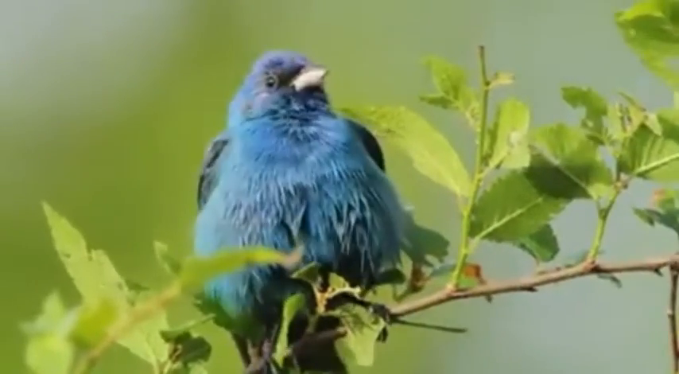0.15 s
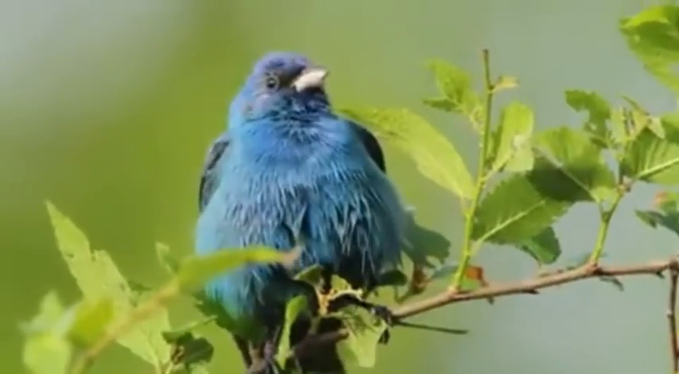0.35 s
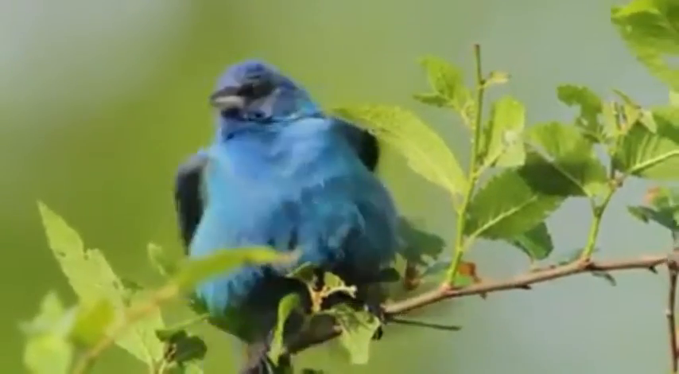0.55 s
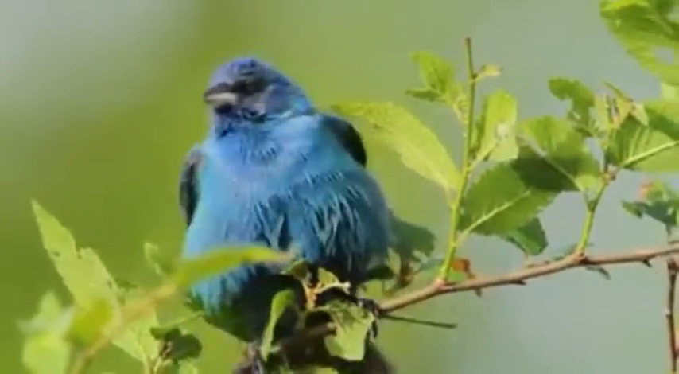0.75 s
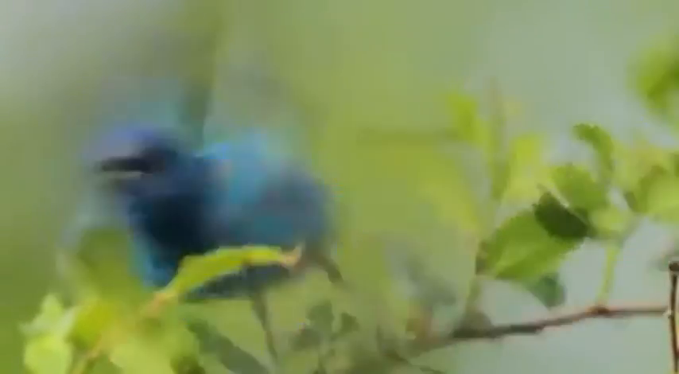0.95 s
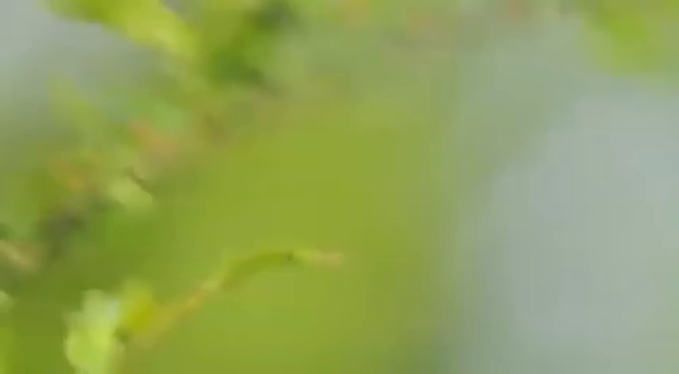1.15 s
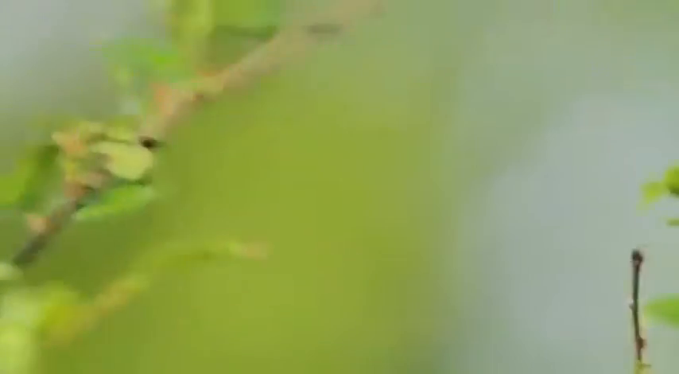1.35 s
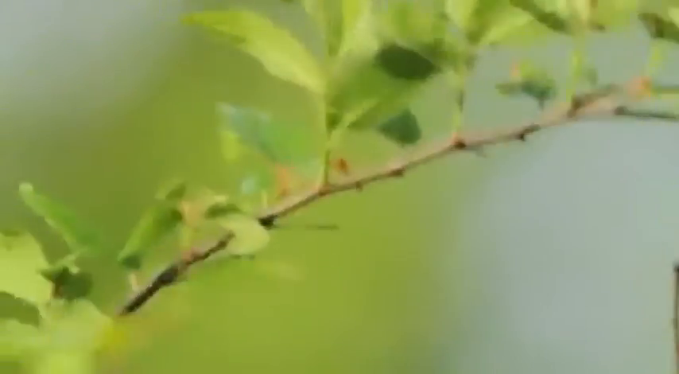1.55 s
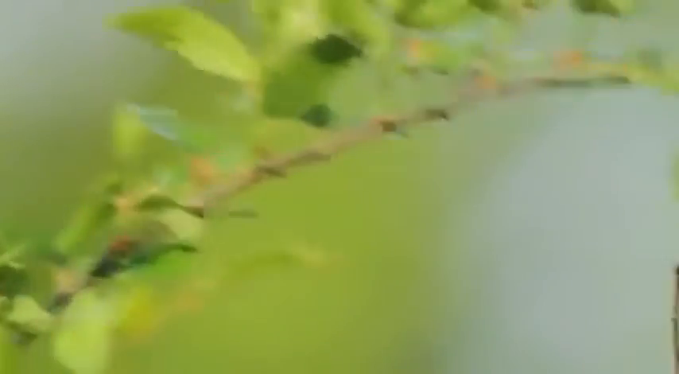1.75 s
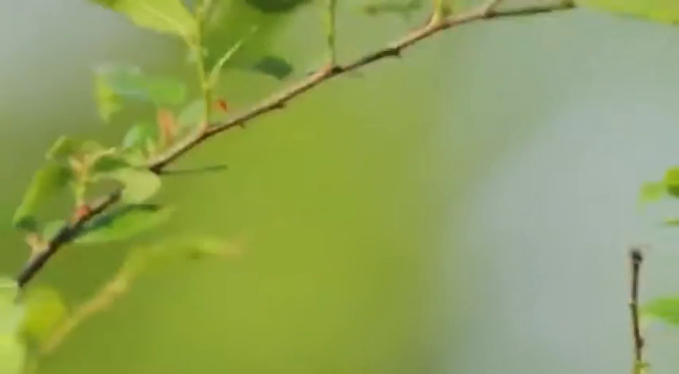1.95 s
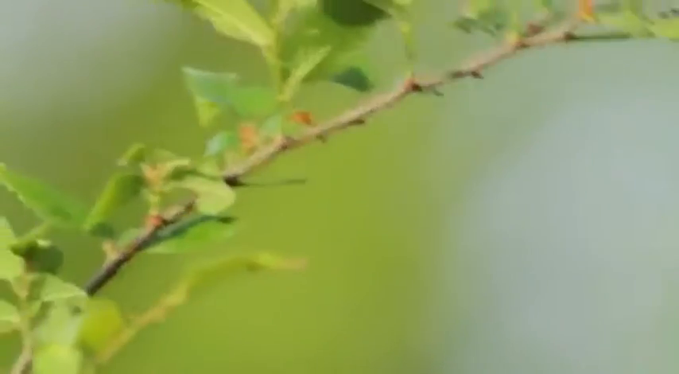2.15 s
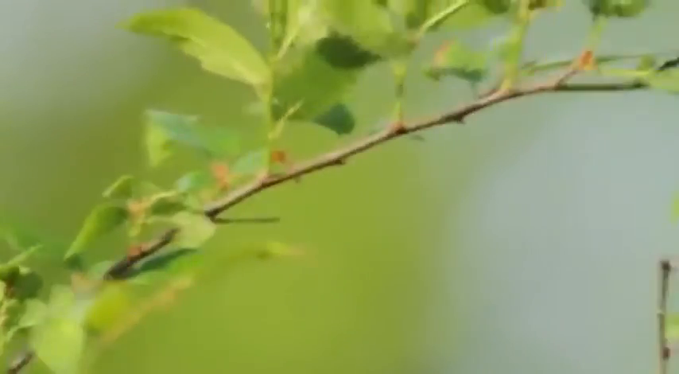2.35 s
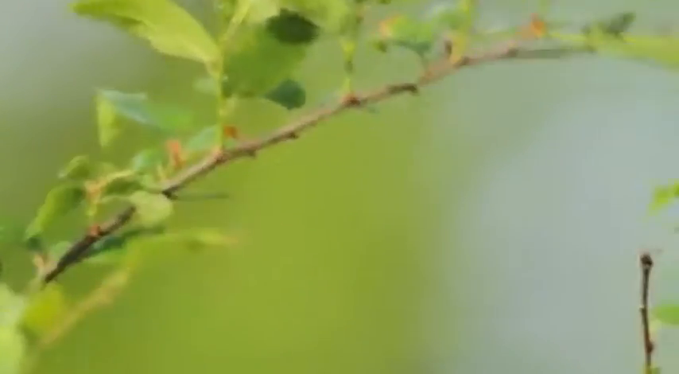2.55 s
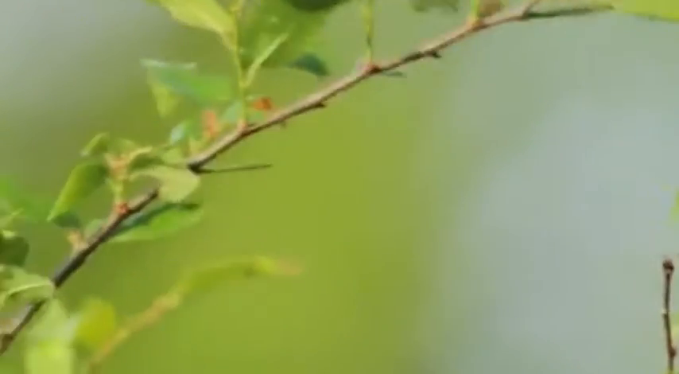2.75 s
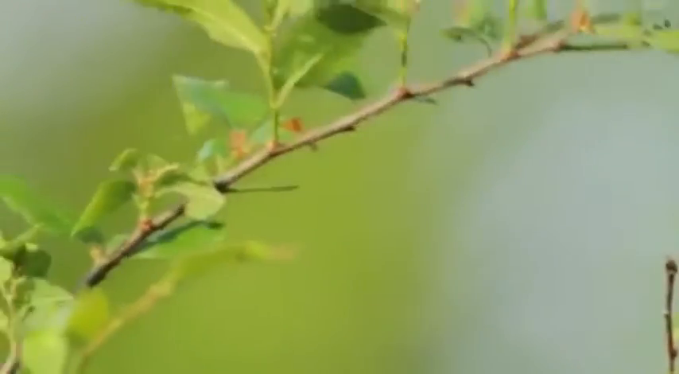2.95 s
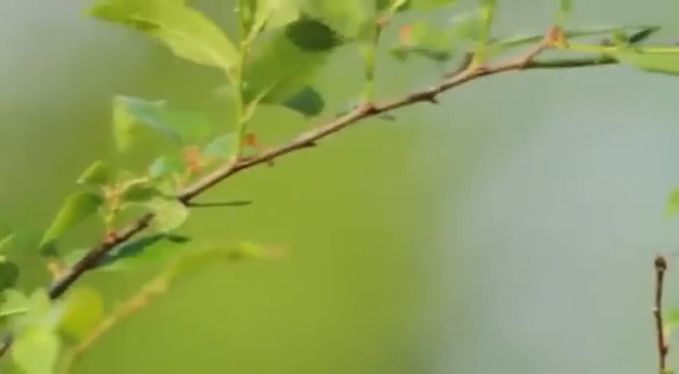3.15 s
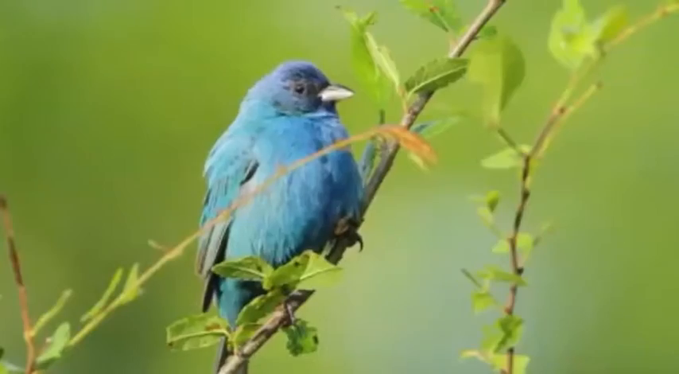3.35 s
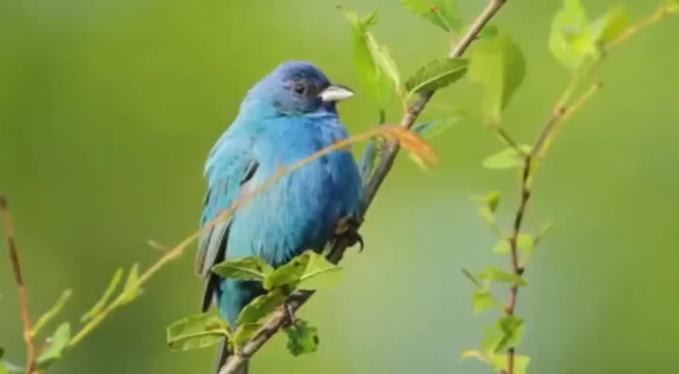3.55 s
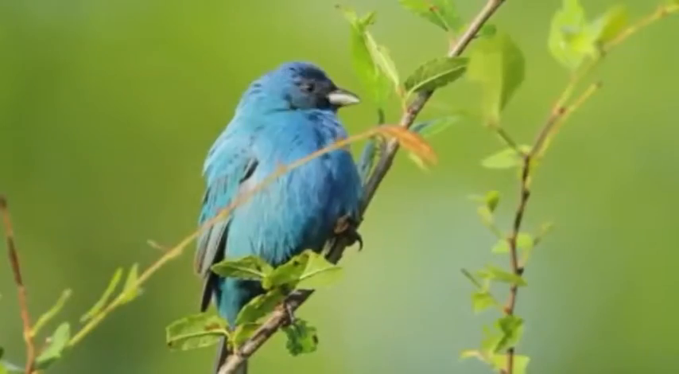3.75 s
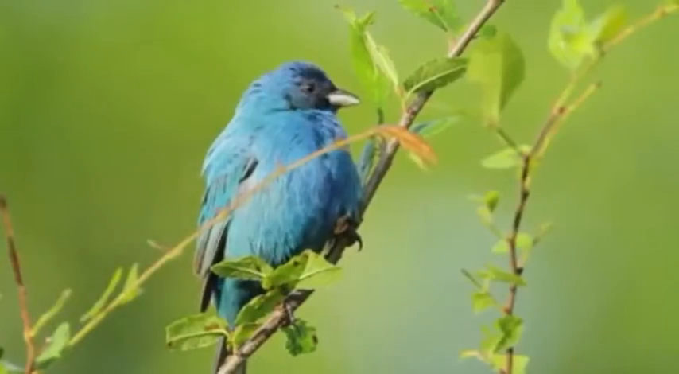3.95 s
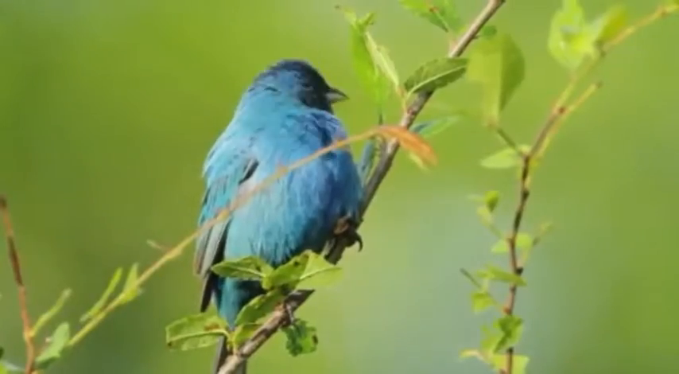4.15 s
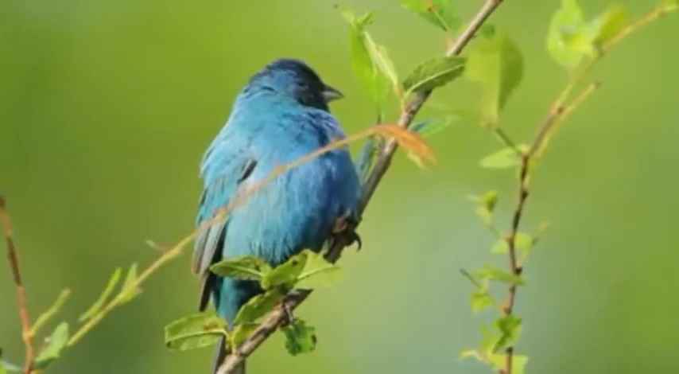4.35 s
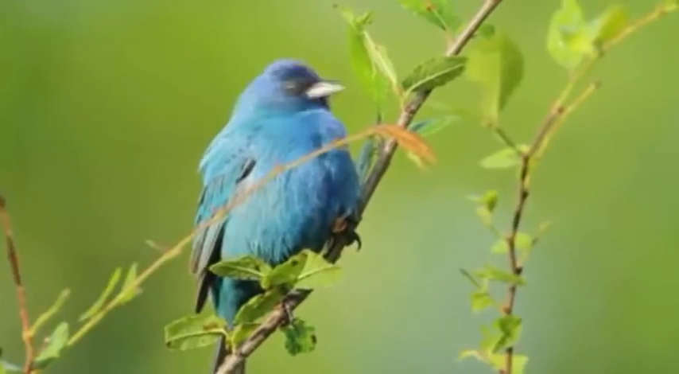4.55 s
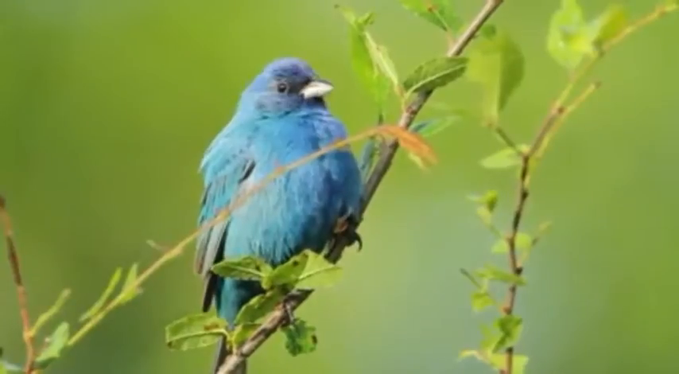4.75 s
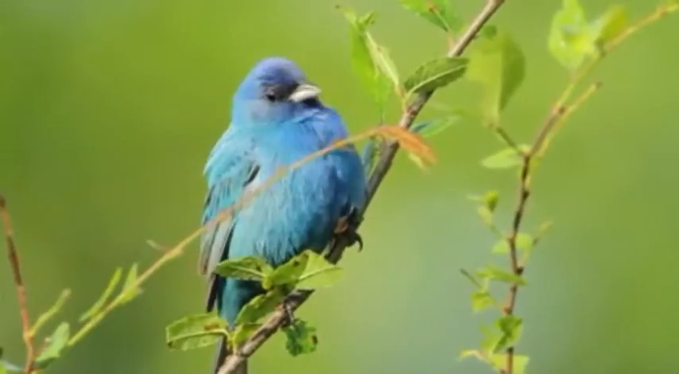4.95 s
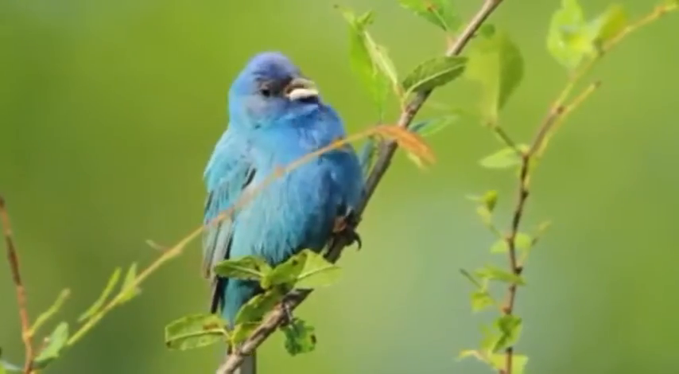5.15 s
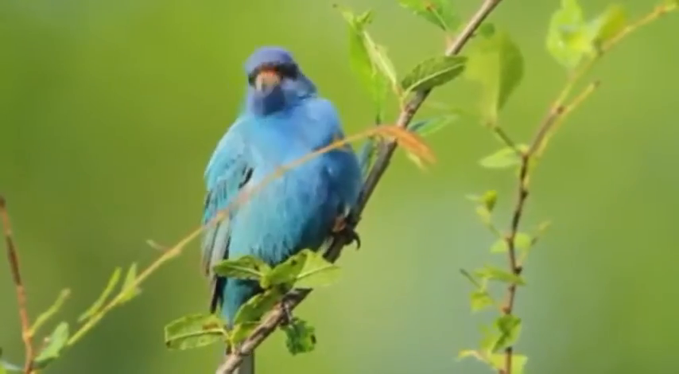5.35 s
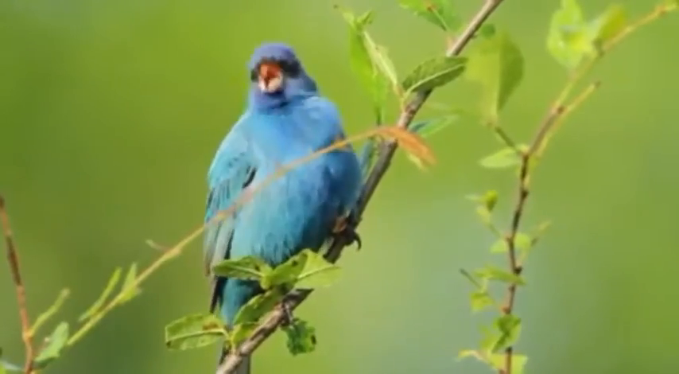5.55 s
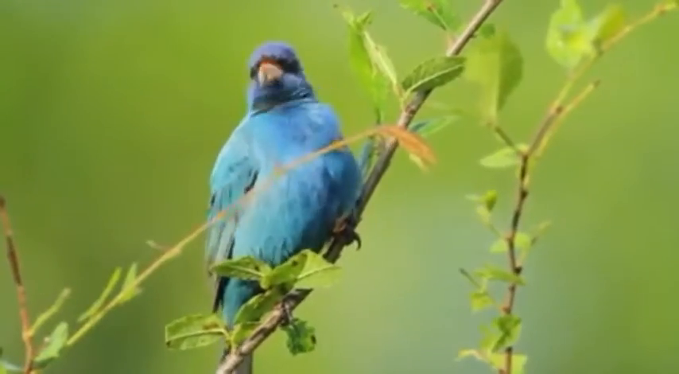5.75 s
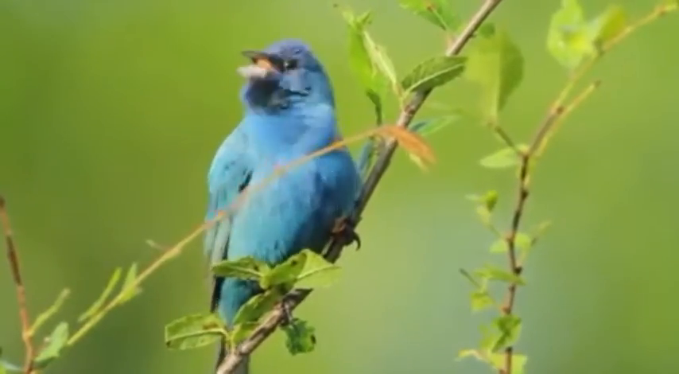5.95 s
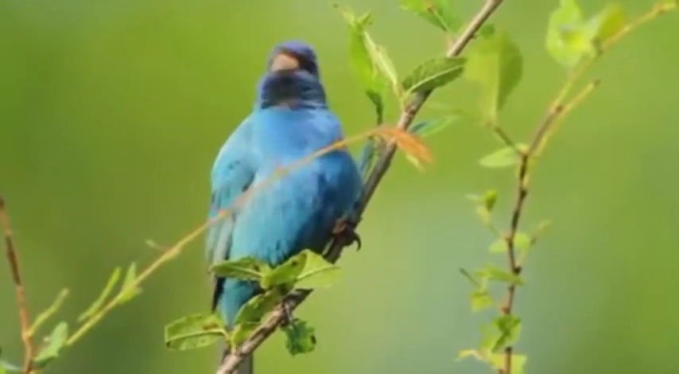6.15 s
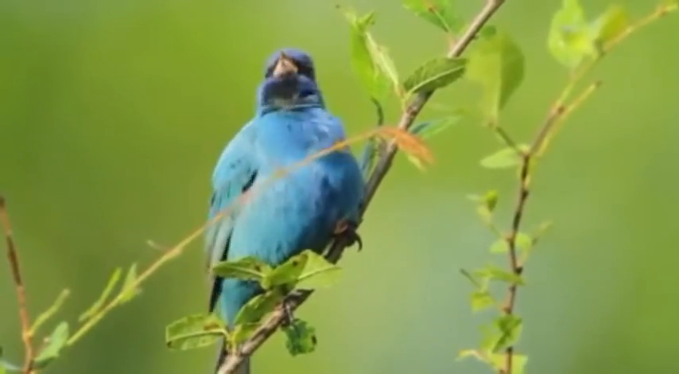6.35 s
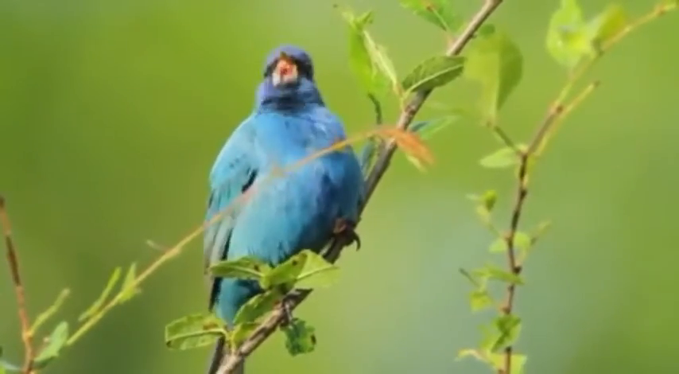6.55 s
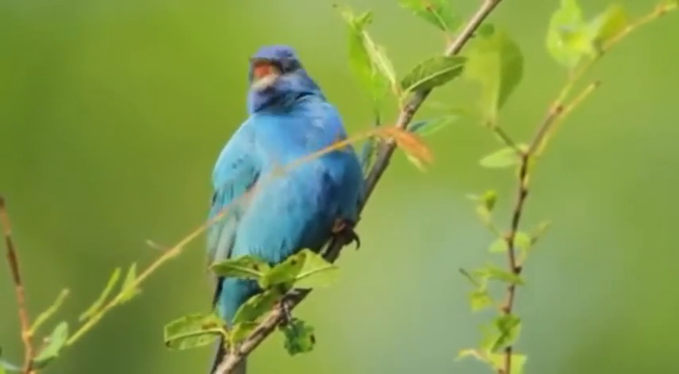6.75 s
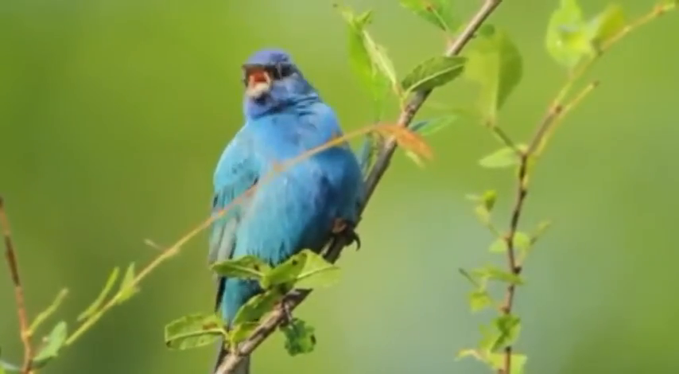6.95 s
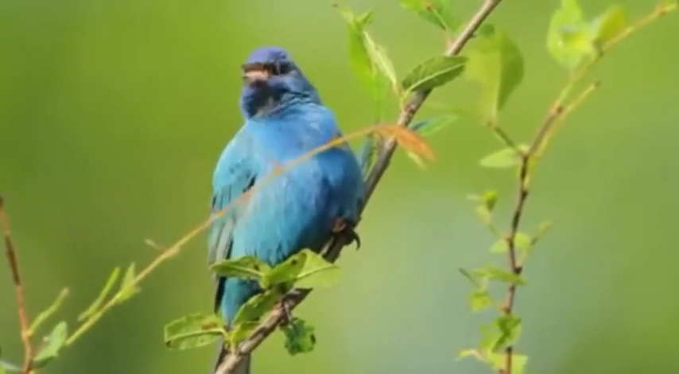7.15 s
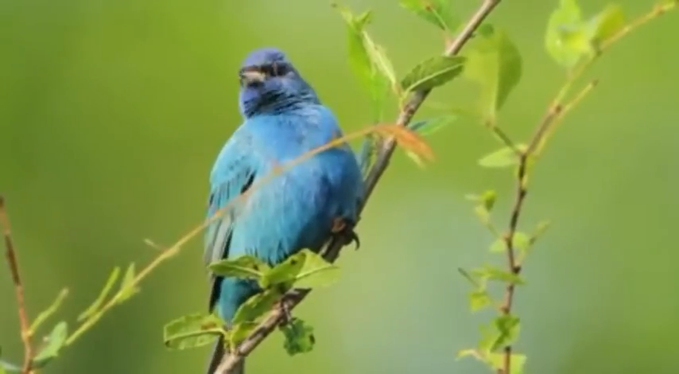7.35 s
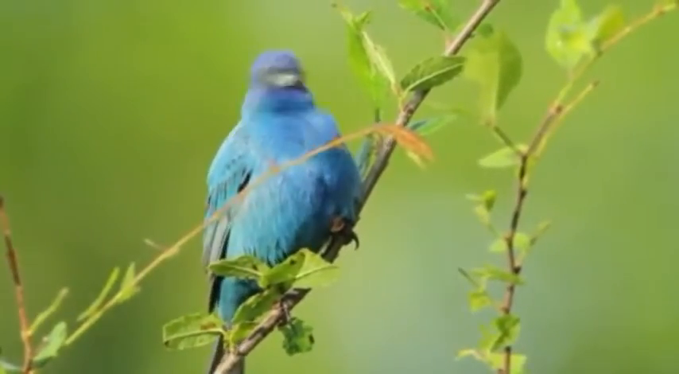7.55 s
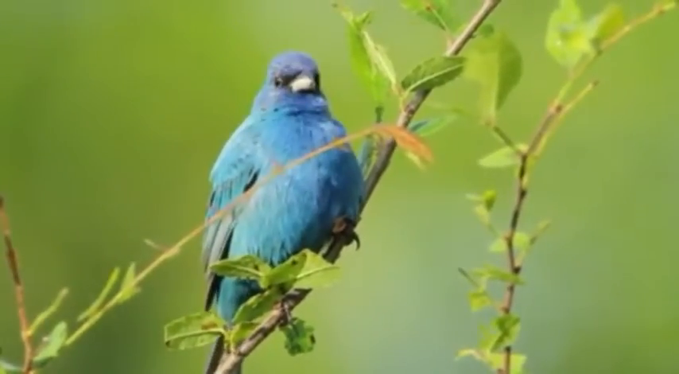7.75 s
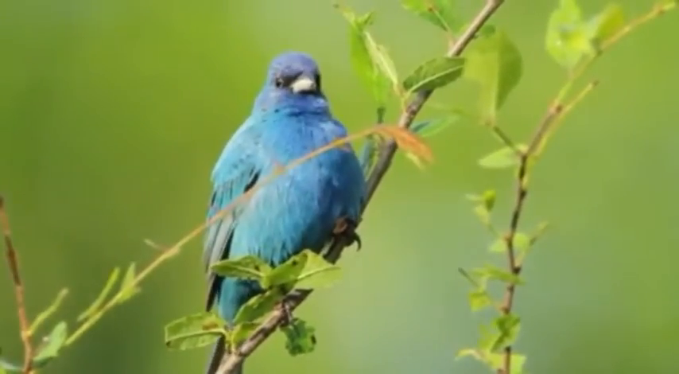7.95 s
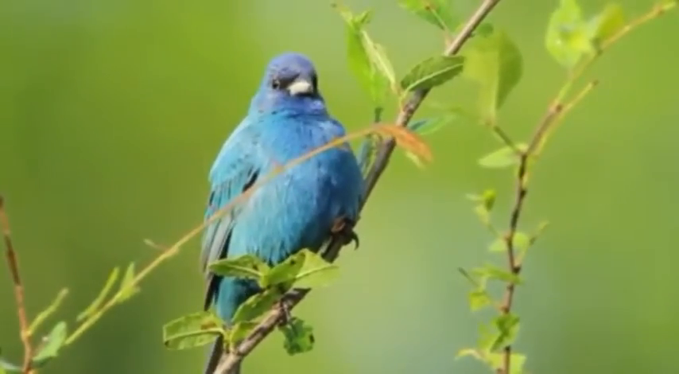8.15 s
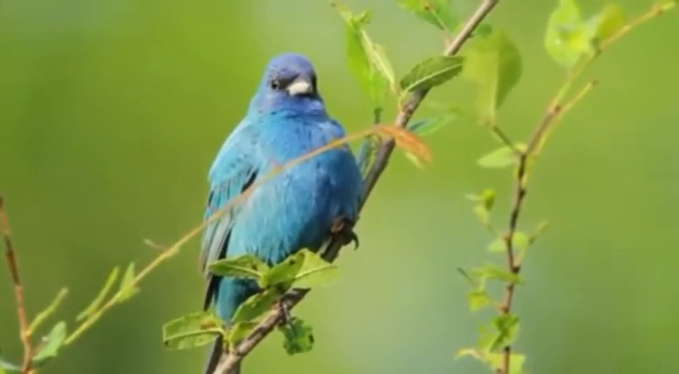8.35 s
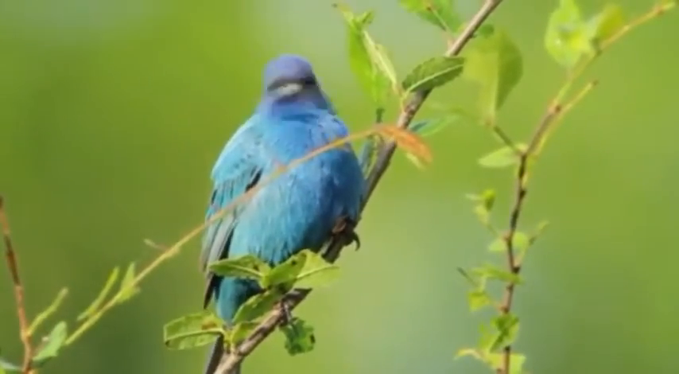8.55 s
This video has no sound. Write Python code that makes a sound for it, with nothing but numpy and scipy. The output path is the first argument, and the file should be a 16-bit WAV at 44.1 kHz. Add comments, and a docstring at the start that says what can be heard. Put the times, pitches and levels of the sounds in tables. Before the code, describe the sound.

Outdoors, distant whistles, a trill and a buzzy call lead to one loud, quick finch-like song, crossed by a short metallic scrape and squeak.

```python
"""A songbird, an indigo bunting, sings one close song of gliding notes, most syllables sung twice, at a wood's edge.
Other birds whistle, chip, trill and buzz further off; a dull knock rebounds, and a metal part scrapes and squeals.
Birds are gliding sines with a weak octave, whistles plain sines, and the buzz a noise-modulated tone.
The metal is noisy slips and ringing modes; foliage adds echoes and a decaying tail, over coloured noise for air."""
import sys
import numpy as np
from scipy import signal
from scipy.fft import rfft, irfft, next_fast_len
from scipy.io import wavfile
from scipy.ndimage import uniform_filter1d, minimum_filter1d, map_coordinates

SR = 44100
rng = np.random.default_rng(int(sys.argv[2]) if len(sys.argv) > 2 else 0)


def bounce(signal):
    """Save signal as a 16-bit WAV file at the path given by the first command-line argument."""
    frames = np.transpose(np.atleast_2d(signal))
    limited = np.clip(frames, -1, 1)
    pcm = np.round(limited * 32767).astype(np.int16)
    wavfile.write(sys.argv[1], SR, pcm)


N = 382788
T = np.arange(N) / SR  # time in seconds

# sudden slips of the metal part: start_s, ring_db, ring_tilt_db_per_octave, rasp_db, rasp_t60_s
CATCHES = [(6.336, -24.5, 6, -30, .6), (6.373, -32.5, 6, -50, .3), (6.459, -25.5, -11, -32, 0.43),
           (6.558, -25.5, -11.5, -32.5, .45), (6.625, -52, -4, -38, 0.24), (7.507, -52, -16, -47.5, 0.46),
           (7.577, -63, -17, -48, 0.047), (7.702, -66, -2, -52, 0.093), (7.826, -61, -16, -47, 0.31)]
# resonant modes of the metal part: frequency_hz, level_db, t60_s
METAL_MODES = [(5300, -8, .3), (5230, 0.5, 0.3), (7075, 2, 0.084), (8460, -9.5, 0.32), (8970, -8.5, 0.081),
               (10240, -11, 0.082), (12600, -18, 0.13), (13600, -16, 0.12), (14900, -32, 0.095)]


def undb(db):
    """Level to amplitude: 20 dB is a factor of ten."""
    return 10 ** (np.asarray(db) / 20)


def unit(x):
    """Normalization: scale a signal to rms 1."""
    return x / np.sqrt(np.mean(x ** 2))


def add(track, start_s, sound):
    """Superposition: add a sound to a track from a given time."""
    i = int(np.clip(start_s * SR, 0, N - 1))
    track[i:i + len(sound)] += sound[:N - i]


def wander(rate_hz, size=N):
    """Slow random modulation: a spline through normal random values, rate_hz of them a second."""
    place = np.arange(size) * rate_hz / SR
    return map_coordinates(rng.standard_normal(size // 16 + 8), [place], order=3, mode="wrap")


def loudness(rows):
    """Amplitude envelope: interpolate start_s, .., level_db and smooth; practically silent outside the rows."""
    rows = np.array(rows)
    level_db = np.interp(T, rows[:, 0], rows[:, -1], left=-150, right=-150)
    return uniform_filter1d(undb(level_db), size=300)


def pitch(rows):
    """Frequency contour: interpolate rows of start_s, pitch_hz, .. linearly."""
    rows = np.array(rows)
    return np.interp(T, rows[:, 0], rows[:, 1])


def held_for(start_s, length_s, attack_s, release_s):
    """Sustained envelope: a linear rise, a hold, then a squared release."""
    rise = np.clip((T - start_s) / attack_s, 0, 1)
    return rise * np.clip(1 - (T - start_s - length_s) / release_s, 0, 1) ** 2


def dying(rows, attack_s):
    """Exponential decay: a quick rise around each start_s, level_db, t60_s, then a fall of 60 dB per t60."""
    return sum(np.clip((T - start) / attack_s + .5, 0, 1) * undb(db - 60 * np.abs(T - start) / t60)
               for start, db, t60 in rows)


def colour(x, points):
    """Spectral shaping: weight a signal by frequency_hz, level_db points, at rms 1."""
    hz, db = np.transpose(points)
    size = next_fast_len(N)
    bins_hz = np.maximum(np.fft.rfftfreq(size, 1 / SR), 1)
    gain = undb(np.interp(np.log(bins_hz), np.log(hz), db))
    return unit(irfft(rfft(x, size) * gain, size)[:N])


def noise(points):
    """Coloured noise: shape a flat random spectrum, at rms 1."""
    return colour(rng.standard_normal(N), points)


def tone(hz):
    """Phase accumulation: a sine of rms 1 follows a frequency curve."""
    return np.sqrt(2) * np.sin(2 * np.pi * np.cumsum(hz) / SR)


def notes(rows, waver, flutter_db, overtone_db):
    """Source and filter: each syrinx gesture glides as a sine, and the throat lets little of its octave out."""
    # one gesture each: time_s, pitch_hz, level_db
    note_shapes = { "intro": [(0, 6350, -27.5), (.03, 6370, -13), (.055, 6030, -16.5), (.063, 5980, -4),
                   (.09, 5895, -7.5), (.12, 5330, -13.5), (.16, 4810, 1.5), (.178, 4690, -10),
                   (.19, 4340, -21)], "tick": [(0, 7100, -20), (.004, 7250, -5), (.009, 6450, 0),
                   (.015, 5480, -1), (.018, 5200, -14)], "hump": [(0, 3750, -21.5), (.009, 3610, -20.5),
                   (.02, 4044, 0.5), (.028, 4186, 1), (.038, 4243, 9), (.044, 3760, -9.5),
                   (.051, 3200, -20.5)], "slur": [(0, 5480, -14), (.012, 5380, 0), (.025, 4980, -1),
                   (.037, 4740, 0), (.048, 4700, -16)], "low": [(0, 3300, -14.5), (.011, 2460, -17.5),
                   (.024, 3720, -4.5), (.036, 3480, 2), (.048, 3364, -4.5), (.056, 3400, 5),
                   (.067, 3160, 1), (.076, 3200, -21)], "vee": [(0, 6450, -24), (.018, 6550, -10),
                   (.031, 6430, 0), (.06, 5850, 0), (.075, 4800, -3), (.089, 4000, -5), (.099, 5050, -2),
                   (.111, 5700, 1), (.118, 5800, -14)], "dip": [(0, 3780, -12), (.008, 4590, -2.5),
                   (.02, 4030, 0.5), (.035, 3650, -6), (.047, 3270, -9)], "rise": [(0, 3544, -22),
                   (.012, 4200, -1.5), (.03, 4670, 0.5), (.05, 5460, -1.5), (.064, 6150, -6.5),
                   (.07, 4860, -3.5)], "fall": [(0, 8200, -12.5), (.012, 7000, 0.5), (.022, 5400, -3),
                   (.032, 4090, -3), (.045, 3650, -16), (.06, 3560, -12)], "lift": [(0, 2537, -6.5),
                   (.058, 2810, -3.5), (.072, 2860, -1.5), (.08, 2750, -16)], "flick": [(0, 3730, -3),
                   (.004, 5320, 0.5), (.009, 6200, -15.5), (.015, 6900, -39.5)], "arch": [(0, 3810, -4),
                   (.007, 5186, -1.5), (.022, 5420, 0.5), (.037, 5300, -3), (.052, 5120, -4),
                   (.065, 4360, 2), (.075, 4000, 4), (.085, 3730, -11), (.105, 3580, -15)],
                   "sweep": [(0, 5400, -16), (.018, 5650, -3), (.033, 5950, 1), (.05, 6500, -4),
                   (.068, 7250, -1), (.076, 7650, -4), (.082, 7850, -20)], "close": [(0, 8220, -20),
                   (.006, 5470, -9), (.009, 3610, -8.5), (.014, 2850, -25.5), (.024, 3730, -12),
                   (.029, 4135, -1.5), (.045, 4650, -5.5), (.06, 4240, -2), (.072, 3900, -5),
                   (.08, 3700, -13), (.11, 3300, -13.5), (.15, 2810, -32)], "chip": [(0, 6350, -11),
                   (.004, 6980, -7), (.011, 7600, -2), (.016, 7650, -14)], "tew": [(0, 5150, -21),
                   (.012, 4920, -8), (.024, 4760, -3), (.033, 4640, 1), (.04, 4420, -13)],
                   "pip": [(0, 4350, -12), (.008, 4000, 0), (.02, 3800, -12)], "warble": [(0, 3353, 3),
                   (.04, 4220, 2.5), (.06, 3322, -13), (.075, 3066, 7.5), (.095, 3350, -2.5),
                   (.125, 2943, -6.5)], "bow": [(0, 4036, -1), (.015, 4500, -4), (.03, 5613, 1.5),
                   (.048, 5730, 7), (.065, 5100, -0.5), (.075, 4830, -34)], "seep": [(0, 8000, -8),
                   (.015, 7100, 0), (.035, 6550, -2), (.045, 6500, -10)], "flute": [(0, 3250, -20),
                   (.022, 2830, -5), (.04, 2790, 0), (.1, 2830, 1), (.125, 2740, -1), (.145, 2200, -9),
                   (.16, 2100, -18)], }
    # the share of the octave that leaves the throat: frequency_hz, level_db
    throat_gain = [(6000, -7.5), (8500, 2.5), (10500, -15.5), (12200, 7), (14000, 7.5), (15000, -6)]
    out = np.zeros(N)
    for start, shape, db, transpose, stretch in rows:
        shape_s, shape_hz, shape_db = np.transpose(note_shapes[shape])
        size = int(shape_s[-1] * stretch * SR)
        t = T[:size] / stretch
        # the muscles round off the corners of the glide
        glide = uniform_filter1d(np.interp(t, shape_s, shape_hz), size=130, mode="nearest")
        glide = glide * transpose * (1 + waver * wander(350, size))
        gain = undb(db + np.interp(t, shape_s, shape_db) + flutter_db * wander(250, size))
        edges = np.clip(np.minimum(t, t[::-1]) / 0.0014, 0, 1)
        octave_db = overtone_db + np.interp(2 * glide, *np.transpose(throat_gain))
        add(out, start, gain * edges * (tone(glide) + undb(octave_db) * tone(2 * glide)))
    return out


def phrase(rows):
    """Hierarchical rhythm: expand syllables into notes, scaling their times and pitches together."""
    # groups of notes: offset_s, shape, level_db, pitch_ratio, length_ratio
    syllable_notes = { "opening": [(0, "intro", 0, 0.98, 1.027)],
                      "stutter": [(0, "tick", -9.5, 0.982, 1.15), (.016, "tick", -4.5, 1.02, 1.05),
                      (.032, "tick", -1.5, 1.044, 0.9), (.047, "hump", -1, 1, 1.03),
                      (.108, "slur", 0.5, 1.001, 1)], "swoop": [(0, "low", -6, 1.026, 1.04),
                      (.072, "vee", -0.5, 0.989, 1.01)], "scoop": [(0, "dip", -6, .94, 1),
                      (.047, "rise", 0, 1, 1.02)], "drop": [(0, "fall", 0, 1, 0.96),
                      (.048, "lift", -9.5, 0.99, 0.94)], "wave": [(0, "flick", -2, 1.06, 1.4),
                      (.005, "arch", -1, 1.005, .995), (.102, "sweep", 0, .985, .985)],
                      "ending": [(0.00024, "close", -1.5, 1.017, 1)],
                      "answer": [(0, "seep", -5, 1.005, 1.2), (.047, "bow", -8.5, 1.12, 0.72),
                      (.124, "bow", -1, 1, .88), (.19, "pip", -15, 0.95, 1.1)], }
    return [(start + offset * pace, shape, db + note_db, key * transpose, pace * stretch)
            for start, name, db, key, pace in rows
            for offset, shape, note_db, transpose, stretch in syllable_notes[name]]


def bunting():
    """Frequency modulation: the close song is paired syllables of fast, nearly pure glides."""
    # start_s, syllable, level_db, pitch_ratio, length_ratio
    song_rows = [(5.342, "opening", -31, 1.002, 1.01), (5.643, "stutter", -19, 1, 1),
                 (5.846, "stutter", -17.5, 1, 0.98), (6.058, "swoop", -19, 1.013, 1),
                 (6.319, "scoop", -21, 1.01, 1.01), (6.483, "scoop", -19.5, 0.98, .975),
                 (6.642, "drop", -20.5, 1, 1), (6.859, "wave", -19, 1.003, 1),
                 (7.098, "wave", -19.5, 0.993, .99), (7.336, "ending", -14.5, 1, 0.99)]
    return notes(phrase(song_rows), waver=0.0059, flutter_db=1.4, overtone_db=-49.5)


def neighbours():
    """Isolated tonal gestures: single calls come from the nearby bushes."""
    # start_s, shape, level_db, pitch_ratio, length_ratio
    near_calls = [(1.205, "chip", -28.5, 1, 0.92), (3.704, "chip", -37.5, .99, 0.9),
                  (8.380, "flute", -33.5, 0.99, 1)]
    return notes(near_calls, waver=.004, flutter_db=1, overtone_db=-60)


def trill(count):
    """Periodic repetition: one evenly spaced note climbs slightly, swells quickly and fades slowly."""
    start_s, gap_s = 3.056, .08
    peak_db, onset_db, fade_db = -30.5, 18.5, 17.5
    pitch_ratio, climb = .99, .0075  # ratio of the first note, and its rise per note
    k = np.arange(count)
    db = peak_db - onset_db * np.exp(-k) - fade_db * (k / k[-1]) ** 3
    rows = [(start_s + i * gap_s, "tew", db[i], pitch_ratio + i * climb, 1) for i in k]
    return notes(rows, waver=.009, flutter_db=1.2, overtone_db=-60)


def answering_bird():
    """Repetition with rising level: a second bird repeats one syllable, growing louder and then steady."""
    # start_s, syllable, relative_level_db, pitch_ratio, length_ratio
    answer_rows = [(7.652, "answer", -46.5, 0.95, 0.95), (7.908, "answer", -44, 0.97, 0.99),
                   (8.158, "answer", -40, 0.98, 0.97), (8.402, "answer", -40, .99, .99),
                   (8.652, "answer", -40, 0.98, 1)]
    return notes(phrase(answer_rows), waver=.012, flutter_db=3.5, overtone_db=-60)


def pips():
    """Pulse train: each short run repeats one falling note at an even gap."""
    # start_s, count, relative_level_db, pitch_ratio
    pip_runs = [(0.241, 3, -50.5, 0.97), (.675, 1, -42, 0.93), (1.472, 3, -47.5, 0.98),
                (1.887, 2, -49.5, 0.9), (2.043, 2, -48, 0.79), (3.567, 2, -57, 0.93), (3.945, 2, -52, .87),
                (4.091, 2, -50, 1.07), (4.555, 2, -54, 1.12), (4.612, 3, -55, 0.88),
                (4.969, 2, -50.5, 1.08)]
    gap_s = .051
    return [(start + i * gap_s, "pip", db, transpose, 1)
            for start, count, db, transpose in pip_runs for i in range(count)]


def twitter(count, scatter_db, pitch_spread):
    """Random timing: each bout strings pips and warbles loosely together at chance pitches and levels."""
    # start_s, length_s, relative_level_db, pitch_ratio
    bouts = [(1.86, .3, -62, .82), (3.2, .95, -59, .95), (4.8, .65, -60, .72), (7.7, .6, -59, .85)]
    rows = []
    for start, length, db, transpose in bouts:
        for i, (late, loud, high) in enumerate(rng.uniform(-1.1, 1, (count, 3))):
            note_s = start + length * (i + .5 + late / 2) / count
            shape, stretch = (("pip", 1), ("warble", .5))[i % 2]
            rows.append((note_s, shape, db + scatter_db * loud, transpose * (1 + pitch_spread * high), stretch))
    return rows


def distant_calls():
    """Superposition: single calls, runs of pips and twitter mix deep in the trees."""
    # start_s, shape, relative_level_db, pitch_ratio, length_ratio
    far_calls = [(.435, "warble", -51, .98, 0.93), (1.875, "seep", -55, 0.98, 0.74),
                 (1.970, "warble", -53, .89, .8), (4.050, "bow", -54, 0.7, 0.38),
                 (4.680, "chip", -40.5, 1.065, 1), (5.195, "chip", -46, 1.03, 1.77),
                 (5.225, "lift", -48, 0.97, 0.52), (5.290, "lift", -47.5, .87, 0.43),
                 (5.325, "bow", -53.5, 0.72, 0.8), (5.482, "chip", -47, 1.01, 3.1),
                 (8.550, "pip", -37, .54, 1.1)]
    rows = far_calls + pips() + twitter(count=9, scatter_db=3, pitch_spread=.15)
    return notes(rows, waver=.012, flutter_db=2.5, overtone_db=-60)


def whistles(rows, waver, bend, flutter_db):
    """Narrow-band modulation: slow sine glides swell and fade, trembling in pitch and level."""
    swell_s = 0.078
    tremble = 1 + waver * wander(120) + bend * wander(16)
    out = np.zeros(N)
    for start, length, first_hz, last_hz, db in rows:
        glide = np.interp(T, [start, start + length], [first_hz, last_hz])
        envelope = held_for(start, length - swell_s, swell_s, swell_s)
        out += undb(db) * envelope * tone(glide * tremble)
    return undb(flutter_db * wander(45)) * out


def far_whistles():
    """Pure-tone radiation: long far whistles glide slowly, and one low whistle quavers."""
    # both tables: start_s, length_s, first_hz, last_hz, level_db
    long_glides = [(-.06, 0.24, 3724, 3685, -40.5), (.16, 0.36, 7060, 5360, -72),
                   (.18, 0.24, 8220, 7120, -60.5), (.21, .24, 6960, 6860, -44), (.41, .11, 6600, 6650, -54),
                   (.5, 0.34, 3450, 3640, -50), (.54, 0.11, 2800, 2740, -55), (.79, .16, 2770, 2790, -60),
                   (.83, 0.25, 6940, 6690, -45), (.93, 0.27, 8300, 7070, -65), (.98, 0.36, 6380, 5350, -70),
                   (1.13, 0.295, 3490, 3374, -47), (1.7, 0.4, 6130, 5180, -71.5),
                   (1.72, 0.15, 7500, 7750, -59.5)]
    low_quaver = [(3.3, 1.5, 2838, 2813, -57.5)]
    return (whistles(long_glides, waver=.004, bend=.003, flutter_db=3.5)
            + whistles(low_quaver, waver=.01, bend=.01, flutter_db=4))


def warbler_buzz(pulse_hz, pulse, grain_db):
    """Ring modulation: noise spreads a mostly climbing tone into a harsh band that pulses quickly."""
    # start_s, centre_hz, noise_rate_hz, relative_level_db
    buzz_rows = [(2.5, 5020, 899, -60), (3.001, 5410, 890, -52), (3.5, 5890, 1110, -58),
                 (3.85, 5660, 789, -47.5), (4.051, 5915, 788, -47), (4.2, 6180, 1417, -54),
                 (4.399, 6670, 2100, -50.5), (4.67, 6620, 2476, -47), (4.929, 7450, 1680, -75)]
    s, _, rate_hz, _ = np.transpose(buzz_rows)
    place = np.cumsum(np.interp(T, s, rate_hz)) / SR
    rasp = map_coordinates(rng.standard_normal(N // 16), [place], order=5, mode="wrap")
    pulses = 1 + pulse * tone(pulse_hz * (1 + 0.057 * wander(5.6)))
    beats = unit(pulses * undb(grain_db * wander(110)))
    return loudness(buzz_rows) * beats * rasp * tone(pitch(buzz_rows))


def scrape(rasp_db, ring_db, sizzle_db, ring_width_hz):
    """Friction excitation: bunched slips rub, rasp and ring the metal's modes; harder rubbing is brighter."""
    # rubbing strokes: start_s, length_s, level_db, attack_s
    stroke_rows = [(6.17, 0.14, -42, 0.092), (6.318, .48, -41.5, .012), (7.43, 0.11, -48.5, 0.019),
                   (7.593, 0.17, -63.5, .03), (7.823, .09, -56, .02)]
    # spectra of the body, the surface and the sizzle of hard rubbing: frequency_hz, level_db
    rub_colour = [(60, -13), (150, -4.5), (400, -2.5), (800, 2), (1300, 1), (2600, -3), (4500, -4),
                  (7000, -16), (10000, -50.5)]
    rasp_colour = [(2500, -14), (4400, 6.5), (5200, 8), (6500, -11), (7700, 9), (8600, 3), (9100, -1),
                   (9600, -1), (10500, -7), (11400, -20), (15000, -45)]
    sizzle_colour = [(11000, -28.5), (12200, 0), (13200, -4.5), (13800, -11), (15500, -16)]
    slips = rng.standard_normal(N) * undb(3.8 * wander(400) + 2.6 * wander(55))
    rubbing = sum(undb(db) * held_for(start, length, attack, release_s=0.1)
                  for start, length, db, attack in stroke_rows)
    force = dying([(start, db, t60) for start, _, _, db, t60 in CATCHES], attack_s=0.01)
    rasp = force * colour(slips, rasp_colour)
    ring = sum(signal.lfilter(*signal.iirpeak(hz, hz / ring_width_hz, fs=SR), rasp) for hz, _, _ in METAL_MODES)
    # cubing the force leaves the sizzle to the hardest rubbing
    sizzle = force * (force / force.max()) ** 2 * colour(slips, sizzle_colour)
    surface = undb(rasp_db) * rasp + undb(ring_db) * ring + undb(sizzle_db) * sizzle
    return rubbing * colour(slips, rub_colour) + surface


def catches(rough):
    """Modal decay: each sudden slip rings the metal's modes, unsteadily while the surfaces still touch."""
    out, t = np.zeros(N), T[:SR // 2]
    for start, db, tilt_db, _, _ in CATCHES:
        for hz, mode_db, t60 in METAL_MODES:
            octaves = np.log2(hz / METAL_MODES[0][0])
            fade = undb(db + mode_db + tilt_db * octaves - 60 * t / t60)
            sine = tone(hz * (1 + rough * wander(700, len(t)))) / np.sqrt(2)  # peak 1
            add(out, start, np.minimum(t / .0015, 1) * fade * sine)
    return out


def squeal(db, waver, stutter_hz, stutter):
    """Stick-slip resonance: rubbing locks onto one tone, its level stuttering many times a second."""
    # start_s, pitch_hz, relative_level_db
    squeal_rows = [(6.33, 2087, -38.5), (6.358, 1935, -39), (6.4, 1922, -32.5), (6.492, 1888, -38),
                   (6.542, 1980, -34.5), (6.638, 2074, -27), (6.714, 1972, -35), (6.756, 2073, -45.5),
                   (6.85, 1980, -67)]
    grip = unit(1 + stutter * tone(stutter_hz * (1 + 0.16 * wander(25))))
    return undb(db) * grip * loudness(squeal_rows) * tone(pitch(squeal_rows) * (1 + waver * wander(120)))


def settling_squeaks():
    """Friction tones: a faint groan and a thin squeak glide as the metal part settles."""
    # start_s, length_s, first_hz, last_hz, level_db
    squeak_rows = [(7.33, .62, 455, 412, -71), (7.41, .34, 2160, 2180, -50)]
    return whistles(squeak_rows, waver=0.011, bend=0.004944, flutter_db=4.0)


def knocks():
    """Impulsive excitation: a dull knock and its weaker rebound are decaying bursts of coloured noise."""
    # start_s, level_db, t60_s
    knock_rows = [(4.217, -47, 0.44), (4.295, -55, 0.17)]
    # frequency_hz, level_db
    knock_colour = [(71, -50), (120, -37), (177, -6), (242, -26), (400, -15), (668, -13), (796, -3),
                    (1310, -12), (1610, -9.5), (2400, -11.5), (3120, -28), (5280, -120)]
    return dying(knock_rows, attack_s=.008) * noise(knock_colour)


def puffs():
    """Enveloped noise: faint low puffs under the song start softly and die away."""
    # start_s, level_db, t60_s
    puff_rows = [(5.678, -51, 0.072), (5.878, -43.5, 0.059), (7.025, -45, 0.14), (7.258, -43, 0.11)]
    # frequency_hz, level_db
    puff_colour = [(40, -29), (130, 6.5), (400, 0.5), (1000, -3), (2500, -42.5)]
    return dying(puff_rows, attack_s=0.019) * noise(puff_colour)


def foliage(x, echo_db, wet_db, t60, side_db):
    """Multiple scattering: a few near reflections and a dense decaying tail, slightly different left and right."""
    # strongest reflections, from the ground and near trunks: delay_s, relative_level_db
    reflections = [(.0065, 0.5), (.0145, 0), (.021, -5.5), (0.033, -9)]
    t = T[:SR]
    fade = undb(-60 * t / t60) * np.clip(t / 0.003, 0, 1)
    mid, side = (signal.fftconvolve(x, rng.standard_normal(SR) * fade)[:N] / np.linalg.norm(fade)
                 for _ in range(2))
    near = x.copy()
    for delay, db in reflections:
        add(near, delay, undb(echo_db + db) * x)
    return near + undb(wet_db) * (mid + undb(side_db) * np.array([side, -side]))


def air(air_db, side_db, swell_db, rumble_db, rumble_swell_db):
    """Broadband ambience: near-mono air noise, a wavering far rumble, and one swell of hiss with a faint whine."""
    # spectra of the air, rumble and hiss: frequency_hz, level_db
    air_colour = [(15, -17.5), (25, -5.5), (43, -10), (138, 1.5), (203, -9), (475, -13), (930, -7.5),
                  (1520, -6), (2020, 0), (3660, -13.5), (4060, -7.5), (5120, -21.5), (7740, -17),
                  (9270, -43.5), (12000, -68), (15600, -84), (22000, -120)]
    rumble_colour = [(35, -30), (55, 5), (72, 3), (110, -23), (400, -76.5)]
    hiss_colour = [(100, -12), (400, -3.5), (650, -7), (1070, 0), (1500, -7.5), (3300, 5), (5000, -10),
                   (8500, -16.5), (11500, -50)]
    # swell of the hiss: time_s, level_db
    hiss_swell = [(2.1, -70), (2.18, -54), (2.6, -53), (3.0, -55), (3.4, -57.5), (3.7, -79)]
    # whine inside the hiss: frequency_hz, level_db against the hiss
    whine_lines = [(151, -16.5), (388, -21), (969, -20), (1061, -12), (2137, -22)]
    side = undb(side_db) * noise(air_colour)
    bed = undb(air_db + swell_db * wander(2.67)) * (noise(air_colour) + np.array([side, -side]))
    rumble = undb(rumble_db + rumble_swell_db * wander(6.3)) * noise(rumble_colour)
    whine = sum(undb(db) * tone(hz * (1 + .01 * wander(40))) for hz, db in whine_lines)
    return bed + rumble + loudness(hiss_swell) * (noise(hiss_colour) + whine)


def scene():
    """Direct-to-reverberant ratio: the birds deep in the trees arrive with the most scattered sound."""
    near_birds = neighbours() + trill(count=12)
    buzz = warbler_buzz(pulse_hz=25.1, pulse=0.15, grain_db=1.5)
    far_birds = undb(-3.5) * (distant_calls() + answering_bird()) + undb(-6.0) * buzz
    metal = scrape(rasp_db=-1.5, ring_db=-3, sizzle_db=-4.5, ring_width_hz=92) + catches(rough=0.01)
    squeaks = squeal(db=1, waver=0.014, stutter_hz=30, stutter=0.34) + settling_squeaks()
    bumps = knocks() + puffs()
    return (foliage(bunting(), echo_db=-15.0, wet_db=-15, t60=0.72, side_db=-21.5)
            + foliage(near_birds, echo_db=-14.5, wet_db=-9.0, t60=0.69, side_db=-17)
            + foliage(far_whistles(), echo_db=-13, wet_db=-6, t60=0.51, side_db=-22)
            + foliage(far_birds, echo_db=-16, wet_db=-2.5, t60=0.67, side_db=-16.5)
            + foliage(metal + squeaks + bumps, echo_db=-21, wet_db=-7, t60=0.51, side_db=-13)
            + air(air_db=-57.99, side_db=-19, swell_db=0.23, rumble_db=-71.5, rumble_swell_db=2))


def limit(x, ceiling_db):
    """Peak limiting: lower the gain for a few milliseconds wherever the sound would pass the ceiling."""
    wanted = np.minimum(1, undb(ceiling_db) / (np.abs(x).max(axis=0) + 1e-9))
    return x * uniform_filter1d(minimum_filter1d(wanted, size=256), size=256)


def record(dry):
    """Band limiting: the recorder holds down the loudest notes, thins the deepest bass and cuts the top."""
    bass_hz, top_hz = 46, 15000
    held = limit(dry, ceiling_db=-12.0)
    thinned = signal.sosfilt(signal.butter(3, bass_hz, "high", fs=SR, output="sos"), held)
    return signal.sosfilt(signal.ellip(8, .2, 70, top_hz, fs=SR, output="sos"), thinned)


dry = scene()
out = record(dry)
bounce(out)
```